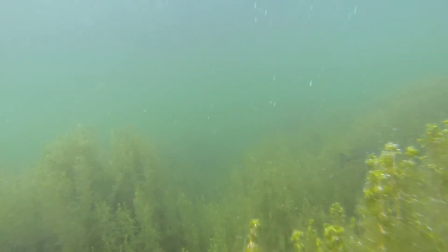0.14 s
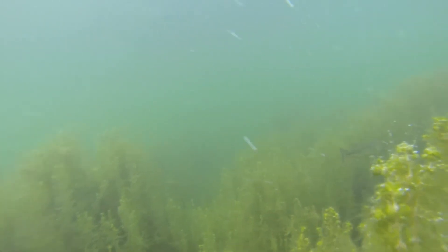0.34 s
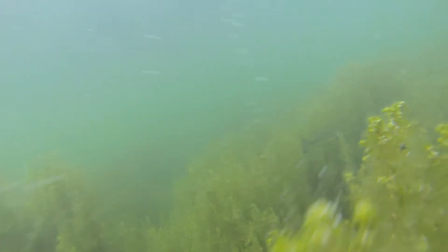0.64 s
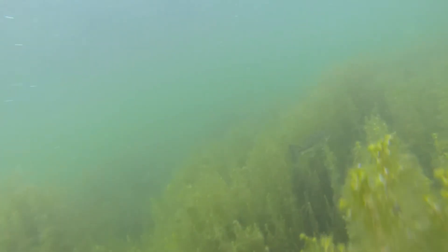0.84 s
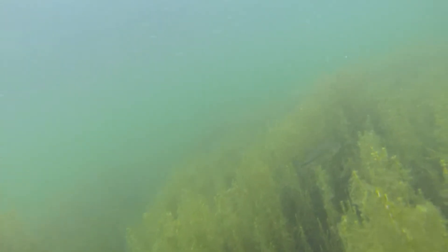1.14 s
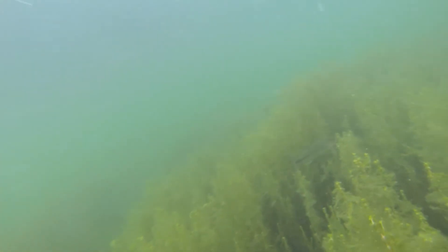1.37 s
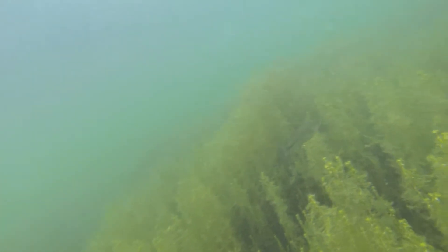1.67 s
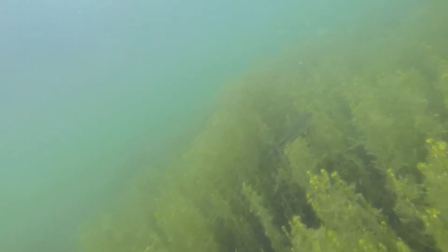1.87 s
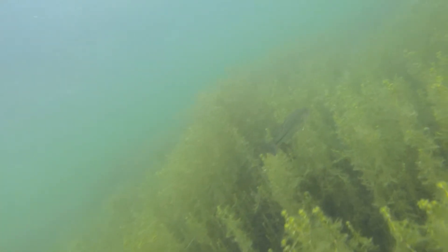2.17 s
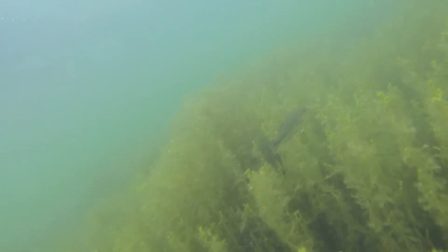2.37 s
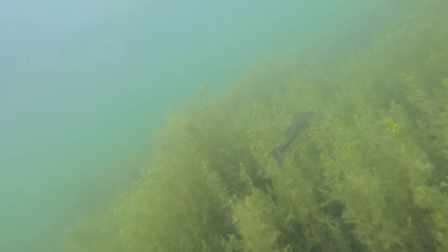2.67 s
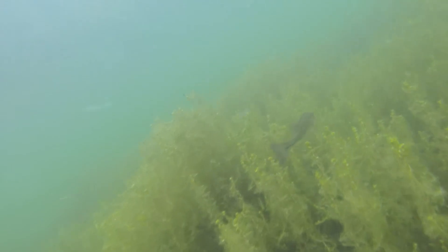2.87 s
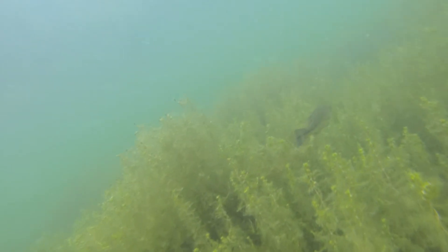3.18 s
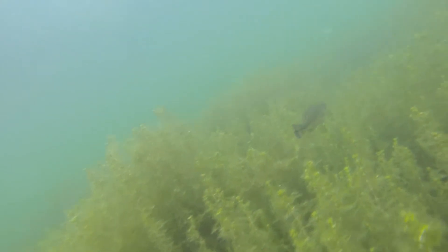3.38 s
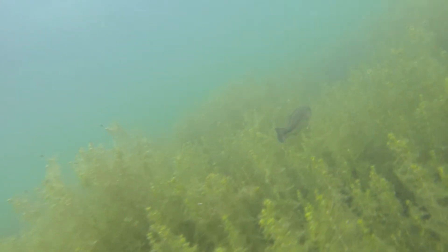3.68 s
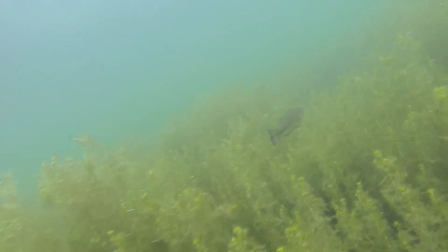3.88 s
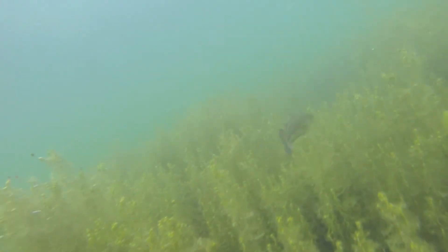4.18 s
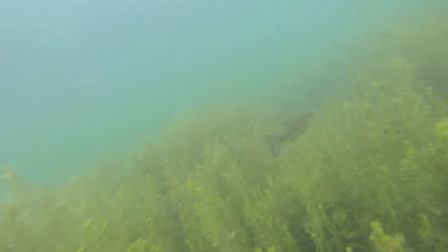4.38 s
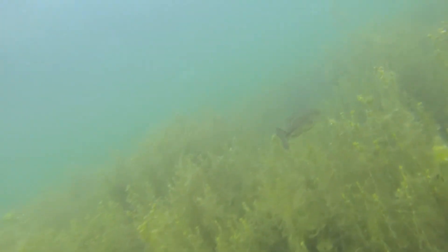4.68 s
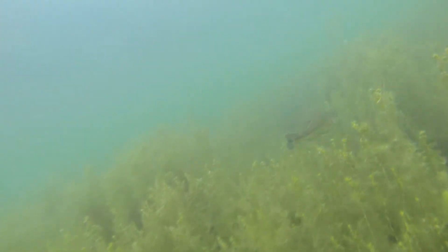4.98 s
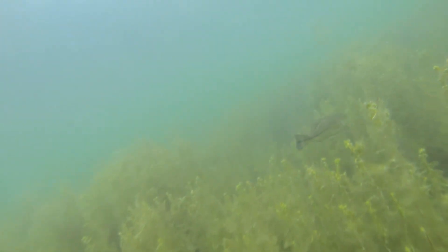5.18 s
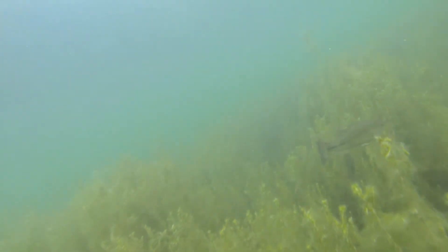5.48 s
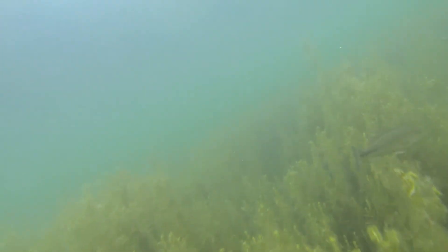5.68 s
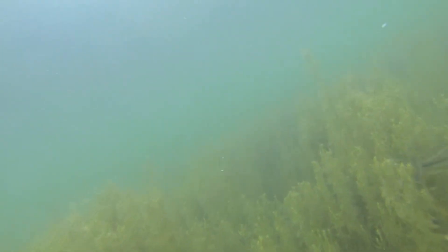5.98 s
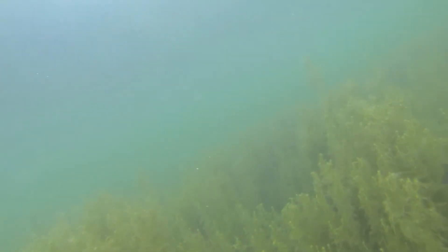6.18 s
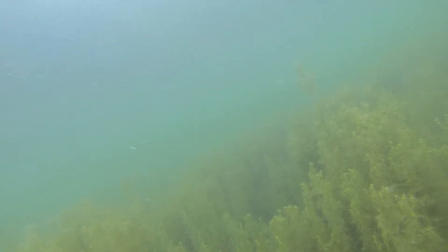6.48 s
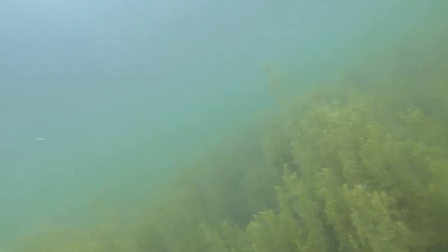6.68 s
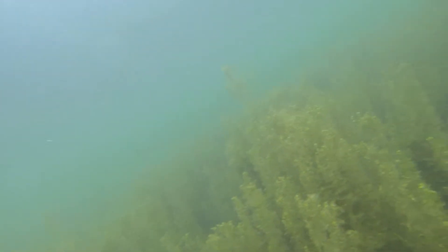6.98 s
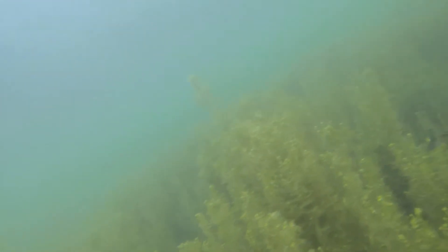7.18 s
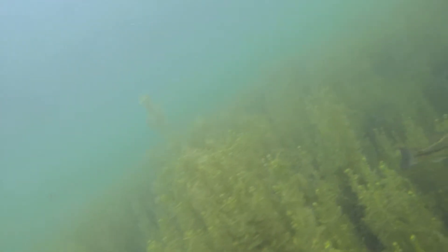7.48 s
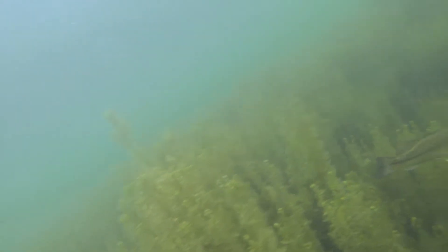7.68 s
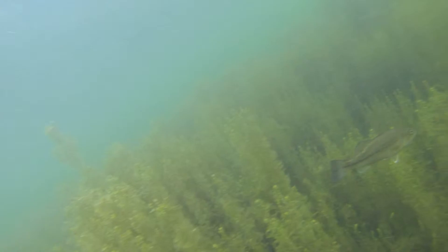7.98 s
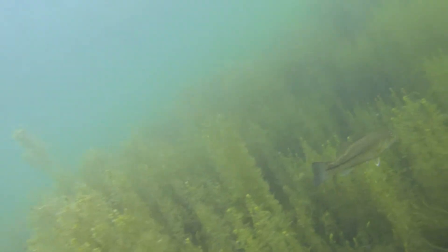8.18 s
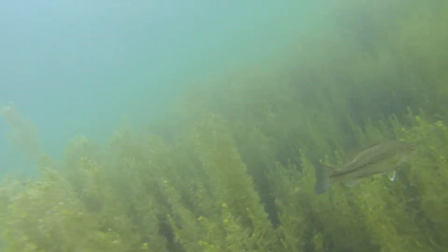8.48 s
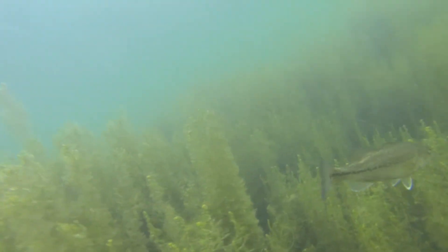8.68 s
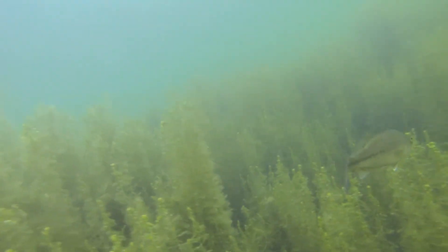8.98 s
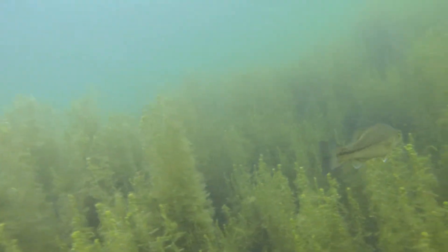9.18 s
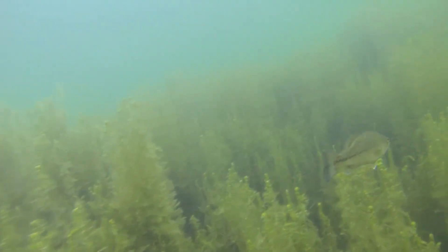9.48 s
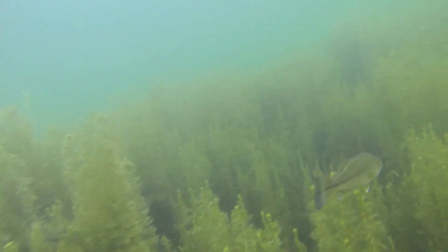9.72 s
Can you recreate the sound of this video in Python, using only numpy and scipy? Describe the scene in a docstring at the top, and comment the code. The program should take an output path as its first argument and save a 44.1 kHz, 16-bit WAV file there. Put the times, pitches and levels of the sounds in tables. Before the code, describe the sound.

Muffled deep underwater rumble with small bubble pings and dull housing knocks, then a drive motor jolts in, droning, hissing and rattling to the end.

```python
"""First comes a deep, uneven underwater rumble, with small bubble pings and knocks on a sealed housing.
A camera glides through a weedy lake: filtered noise makes the rumble, dying sines the pings and knocks.
After six seconds a drive motor jolts in, with a drone, faint whines, a pulsing hiss and rattling parts;
near 7 s there is a quick run of gurgling bumps. Hiss, ticks and rattle cracks are noise or clicks sent
through a set of wall resonances. Faint self-noise and thin wavering tones of the electronics lie underneath."""
import sys
import numpy as np
from scipy import signal
from scipy.fft import rfft, irfft, next_fast_len
from scipy.io import wavfile
from scipy.ndimage import uniform_filter1d

SR = 44100
rng = np.random.default_rng(int(sys.argv[2]) if len(sys.argv) > 2 else 0)


def generate_wav(sig):
    """Save sig (samples, or channels by samples) to the path in sys.argv[1] as 16-bit PCM at SR."""
    pcm = np.round(np.clip(np.atleast_2d(sig).T, -1, 1) * 32767).astype(np.int16)
    wavfile.write(sys.argv[1], SR, pcm)


N = 434385   # length in samples
MOTOR_ON_S = 6.155


def amp(db):
    """Turns decibels into a plain factor."""
    return 10 ** (np.asarray(db) / 20)


def rms_one(x):
    """Scales a signal to an average strength (rms) of 1."""
    return x / np.sqrt(np.mean(x ** 2) + 1e-20)


def in_time(rows):
    """Draws straight lines between table rows: each column as a curve with a value at every sample."""
    s, *columns = np.transpose(rows)
    return [np.interp(np.arange(N) / SR, s, c) for c in columns]


def drift(rate_hz):
    """Slow random wandering with a spread of 1, from smoothed noise made at every 40th sample."""
    r = np.exp(-80 * np.pi * rate_hz / SR)
    noise = rng.standard_normal(N // 40 + 2002)
    slow = signal.lfilter([1], [1, -2 * r, r * r], noise)[2000:]   # drop the filter's start-up
    return np.interp(np.arange(N) / 40, np.arange(len(slow)), rms_one(slow))


def coloured(spectrum):
    """Noise shaped to the given spectrum, rms 1."""
    size = next_fast_len(N)
    hz, db = np.transpose(spectrum)
    grid = np.log(np.maximum(np.arange(size // 2 + 1) * SR / size, 1))
    gain = amp(np.interp(grid, np.log(hz), db, left=-200, right=-200))
    return rms_one(irfft(rfft(rng.standard_normal(size)) * gain, size)[:N])


def resonance(x, hz, width_hz):
    """Two-pole resonance: favours one pitch and rings on; gain about 1 at its peak."""
    r = np.exp(-np.pi * width_hz / SR)
    top = np.array([1, 0, -1]) * (1 - r * r) / 2
    return signal.lfilter(top, [1, -2 * r * np.cos(2 * np.pi * hz / SR), r * r], x + 1e-18)


def add(out, s, hz, db, t60, rise_s):
    """Adds a sine at time s that rises softly and falls by 60 dB in t60 seconds."""
    t, at = np.arange(int(t60 * SR)) / SR, int(s * SR)
    envelope = amp(db - 60 * t / t60) * (1 - np.exp(-t / rise_s)) ** 2
    ring = envelope * np.sin(2 * np.pi * hz * t)
    out[at:at + len(t)] += ring[:N - at]


def grains(per_s, spread_db):
    """Random clicks of uneven size and either sign, rms 1."""
    sizes = amp(spread_db * np.minimum(rng.exponential(1, N), 5)) * rng.choice([-1, 1], N)
    return rms_one(sizes * (rng.random(N) < per_s / SR))


def scattered(count, from_s, to_s, db, spread_db, low_hz, high_hz):
    """Random columns of time, level and pitch: uneven strength, low pitches more common."""
    when, size, pitch = rng.random((int(count), 3)).T
    times = from_s + (to_s - from_s) * when
    levels = db + spread_db * (2 * size - 1)
    return times, levels, low_hz * (high_hz / low_hz) ** (pitch ** 2)


def wall_gain(hz, db, tilt_db):
    """Strength of one wall resonance, tilted by tilt_db per octave above 2 kHz."""
    return amp(db + tilt_db * max(np.log2(hz / 2000), 0))


# Wall resonances of the housing, before any tilt: [f/Hz, width/Hz, level/dB]
WALLS = [(1145, 40, -9.5), (1295, 91, -3.5), (1460, 58, 3), (1700, 140, 0), (1790, 36, -1), (1880, 72, 5.5),
         (1891.5, 143.6, 5.5), (2520, 230, -5.5), (2720, 180, -5), (3050, 202, -6), (3520, 160, -8.5),
         (3976, 204, -12.5), (4990, 580, -20.5), (5100, 69, -35.5), (5330, 420, -44), (6320, 240, -26),
         (6840, 680, -33.5), (8130, 440, -32), (9400, 900, -47), (13100, 900, -67)]


def walls(force, tilt_db=0, span=slice(None)):
    """The housing walls ring at their own pitches when shaken; silent outside span."""
    out = np.zeros(N)
    # neighbouring resonances take turns in sign
    out[span] = sum((-1) ** k * wall_gain(hz, db, tilt_db) * resonance(force[span], hz, width)
                    for k, (hz, width, db) in enumerate(WALLS))
    return out


def resonant_grains(per_s, spread_db, tilt_db, soft_s):
    """Each grain is a short puff that sets only one wall resonance ringing; rms 1."""
    clicks, dealt = grains(per_s, spread_db), rng.integers(0, len(WALLS), N)
    white, r = rng.standard_normal(N), np.exp(-1 / (soft_s * SR))
    total = np.zeros(N)
    for k, (hz, width, db) in enumerate(WALLS):
        puffs = white * signal.lfilter([1], [1, -2 * r, r * r], clicks * (dealt == k) + 1e-18)
        ring = resonance(resonance(puffs, hz, width), hz, 6.6 * width)
        total += wall_gain(hz, db, tilt_db) * ring
    return rms_one(total)


# Colour of the broad self-noise: [f/Hz, relative level/dB per Hz]
SELF_NOISE = [(530, -40), (900, -7.5), (1800, -9.5), (2230, -18.5), (5190, -10), (5850, -15),
              (10100, -18.5), (13600, -25.5), (14800, -33.5), (15200, -53.5)]
# Thin tones of the electronics, average levels before wavering: [f/Hz, width/Hz, level/dB]
ELECTRONICS = [(3960, 230, -81.5), (5100, 250, -80), (6630, 93, -90.5), (7800, 120, -87.5),
               (9830, 200, -87), (10430, 22, -91), (11600, 250, -90), (15561, 11, -100), (15639, 14, -96)]
SELF_NOISE_DB = -72


def electronics():
    """Broad self-noise, and thin wavering tones made by passing noise through narrow resonances."""
    white = rng.standard_normal(N)
    tones = np.zeros(N)
    for hz, width, db in ELECTRONICS:
        tone = rms_one(resonance(resonance(white, hz, width), hz, width))
        tones += amp(db + 1.3 * drift(14)) * tone
    return amp(SELF_NOISE_DB) * coloured(SELF_NOISE) + tones


# Water along the walls, before random wavering; the fizz column also sets the hiss:
# [t/s, wash level/dB, gurgle level/dB, fizz level/dB]
STREAM = [(0, -34, -56, -59), (0.3, -38, -56.5, -60), (0.6, -29.5, -54, -60.5), (1.0, -34, -55, -60.5),
          (1.9, -35, -54.5, -63.5), (2.4, -35.5, -55, -62), (3.0, -39.5, -55, -64), (3.6, -36.5, -57, -63),
          (3.9, -34, -57.5, -65), (4.2, -39, -54.5, -64), (4.55, -36.5, -56, -65), (4.9, -33, -52, -63),
          (5.2, -38.5, -56.5, -61), (5.65, -37.5, -56.5, -61.5), (6.1, -39, -57.5, -60.5),
          (6.85, -33.5, -51.5, -73), (6.99, -36, -45, -62), (7.12, -36.5, -54, -51), (7.5, -35, -55.5, -50),
          (8.0, -41, -46, -49), (8.5, -42, -53, -51.5), (9.1, -46.5, -50.5, -52.5),
          (9.85, -41.5, -50, -47.5)]
FIZZ_PER_S, FIZZ_SPREAD_DB, FIZZ_DB = 500, 3.0, -4   # FIZZ_DB: fizz grains against the hiss


def water():
    """Faint hiss and fizz of the lake: steady noise and tiny grains, heard through the walls."""
    hiss = rms_one(walls(rng.standard_normal(N), tilt_db=-8.5))
    fizz = resonant_grains(FIZZ_PER_S, FIZZ_SPREAD_DB, tilt_db=5.5, soft_s=0.001)
    _, _, level_db = in_time(STREAM)
    return amp(level_db) * (amp(1.2 * drift(11.0)) * hiss + amp(FIZZ_DB) * fizz)


# Level of the deep rumble before the low-pass; its short dips are chance beating: [t/s, level/dB]
RUMBLE = [(0.0, -36.5), (0.22, -28.5), (0.27, -37), (0.41, -15), (0.44, -29), (0.52, -11.5), (0.55, -20.5),
          (0.69, -18.5), (0.71, -28), (0.79, -17), (1.15, -17), (1.23, -13), (1.29, -38), (1.34, -17),
          (1.81, -19), (1.86, -20), (2.06, -16.5), (2.47, -19), (2.55, -14.5), (2.71, -22), (2.8, -9.5),
          (2.94, -23.5), (3.07, -15), (3.1, -27.5), (3.35, -13.5), (3.4, -27.5), (3.46, -12.5),
          (3.79, -23.5), (3.98, -18), (4.06, -24), (4.2, -12), (4.31, -19.5), (4.39, -12), (4.5, -21.5),
          (4.72, -12), (4.77, -18), (5.1, -14), (5.27, -17), (5.57, -13.5), (5.62, -27), (5.79, -16),
          (5.9, -26), (5.93, -20.5), (6.17, -19.5), (6.36, -28), (6.5, -17.5), (7.1, -16.5), (7.13, -27),
          (7.3, -16), (7.52, -21.5), (7.87, -14), (7.95, -18.5), (8.15, -12.5), (8.26, -19), (8.45, -14.5),
          (9.16, -24), (9.19, -19), (9.71, -30), (9.77, -23.5), (9.85, -42)]
# Colour of the low wash: [f/Hz, relative level/dB per Hz]
WASH = [(35, -39), (60, -3), (67, -27), (70, -4), (92, -16), (151, -18), (200, -36.5), (260, -61),
        (340, -72), (570, -120)]
# Colour of the gurgle: [f/Hz, relative level/dB per Hz]
GURGLE = [(120, -12.5), (200, 8.5), (220, 0), (356, -7), (426, -8), (576, -3.5), (966, -20), (1200, -14.5),
          (1560, -51), (2640, -120)]
ROCK_HZ, ROCK_WIDTH_HZ = 37.6, 10.4
ROCK_EVEN = 0.88   # how far the swing is evened out, 0-1


def flow():
    """Turbulence rocks the housing at a deep resonance, swinging more evenly than plain noise; water washes."""
    (rumble_db,), (wash_db, gurgle_db, _) = in_time(RUMBLE), in_time(STREAM)
    shaken = resonance(rng.standard_normal(N), ROCK_HZ, ROCK_WIDTH_HZ)
    swing = rms_one(resonance(shaken, ROCK_HZ, 34.0))
    size = np.sqrt(uniform_filter1d(swing ** 2, size=SR // 25) + 0.073)
    even_swing = rms_one(swing / size ** np.clip(ROCK_EVEN, 0, 1))
    surge = rms_one(resonance(rng.standard_normal(N), 10.0, 42))   # slow push of the water
    rumble = amp(rumble_db) * rms_one(even_swing + amp(-7.5) * surge)
    # the heavy housing cannot move fast
    rumble = signal.sosfiltfilt(signal.butter(4, 60, fs=SR, output="sos"), rumble)
    wash = amp(wash_db + 0.63 * drift(29)) * coloured(WASH)
    gurgle = amp(gurgle_db + 2.0 * drift(8.5)) * coloured(GURGLE)
    return rumble + wash + gurgle


# Sharp ticks on the walls, strength before filtering: [t/s, relative level/dB]
TICKS = [(0.91, -49.5), (1.03, -45.5), (1.037, -48), (1.046, -60), (1.069, -65), (1.209, -60), (1.236, -53),
         (1.626, -51), (2.531, -52.5), (2.779, -59), (2.792, -52), (2.834, -56), (2.842, -54),
         (3.464, -49.5), (4.2465, -54), (4.379, -53), (4.3995, -48.5), (4.406, -58), (4.414, -64),
         (4.6656, -55), (4.673, -60), (4.726, -49.5), (4.733, -64), (4.9905, -56), (5.065, -54.5),
         (5.4273, -55), (5.493, -58)]
TICK_DB = 18   # boost of every tick


def ticks():
    """Short contacts: a soft snap into the broad body, and a noisy puff that reaches the wall resonances."""
    force = np.zeros(N)
    force[[int(s * SR) for s, db in TICKS]] = amp(np.array(TICKS)[:, 1] + TICK_DB)
    r = np.exp(-1 / (0.0016 * SR))
    puff_shape = signal.lfilter([np.e * (1 - r)], [1, -2 * r, r * r], force + 1e-18)
    puff = puff_shape * rng.standard_normal(N)
    contact = puff + amp(14.0) * force
    body = amp(-2.0) * resonance(contact, 840, 370)
    body += amp(-13.0) * resonance(contact, 1100, 710)
    body += amp(-29.5) * resonance(contact, 2300, 1800)
    ringing = walls(puff, tilt_db=2.5, span=slice(int(MOTOR_ON_S * SR)))
    damped = signal.butter(2, 11000, fs=SR, output="sos")
    return signal.sosfilt(damped, amp(-3.5) * ringing + body)


# Small bubbles, level before the boosts below: [t/s, relative level/dB, f/Hz]
PINGS = [(0.1017, -50, 1630), (0.1176, -37, 1620), (0.1645, -35.5, 1890), (0.2214, -40, 1980),
         (0.2623, -33.5, 1680), (0.3282, -37.5, 1790), (0.376, -35, 1500), (0.4459, -37.5, 1570),
         (0.5467, -37.5, 1520), (0.5661, -40, 1480), (0.594, -45, 1730), (0.6155, -38, 1910),
         (0.7008, -46, 1420), (0.7382, -39.5, 1790), (0.8924, -48, 1480), (0.9108, -38, 1600),
         (1.0306, -47, 1470), (1.0695, -59, 1300), (1.1363, -48, 1880), (1.2451, -49, 1480),
         (1.2825, -39.5, 1580), (1.4227, -42.5, 1480), (1.495, -36, 1550), (1.5309, -45, 1530),
         (1.9106, -45.5, 1820), (2.1919, -43, 1650), (2.2443, -42, 1840), (2.3106, -42, 1800),
         (2.3346, -36, 1830), (2.4114, -40.5, 1730), (2.5311, -50, 1290), (2.7921, -51, 1290),
         (2.824, -47, 1790), (2.8724, -40, 1760), (2.9806, -47, 1790), (3.1892, -46, 1790),
         (3.2355, -31.5, 1700), (3.4017, -53, 1780), (3.4535, -51, 1310), (3.465, -42, 1570),
         (3.5518, -41.5, 1790), (3.6037, -46, 1480), (3.8287, -46, 1800), (3.9095, -41.5, 1780),
         (4.14, -40, 1780), (4.2482, -56, 1300), (4.3335, -45, 1740), (4.3999, -41, 1620),
         (4.4832, -53, 1460), (4.7262, -46, 1450), (4.7466, -46, 1890), (4.783, -45, 1590),
         (4.814, -57, 1450), (4.8823, -38, 1640), (4.9422, -50, 1480), (4.9901, -57, 1350),
         (5.0065, -45, 1460), (5.1297, -46, 1450), (5.22, -53, 1420), (5.245, -42, 1490),
         (5.2704, -40, 1520), (5.3028, -43, 1480), (5.3882, -50, 1470), (5.5712, -37.5, 1790),
         (5.6496, -48, 1880), (5.7583, -48, 1480), (5.8062, -43, 1480), (5.8267, -41, 1850),
         (5.9269, -47, 1420), (5.9783, -43, 1760), (6.0172, -46, 1770), (6.0482, -40, 1750),
         (6.0681, -36, 1740), (6.118, -38, 1850), (6.1464, -43, 1430), (0.0267, -47, 2620),
         (0.1365, -50, 2730), (0.1569, -41.5, 3390), (0.2563, -63, 2970), (0.2803, -60, 2550),
         (0.4654, -45, 2350), (0.6528, -37.5, 2880), (0.6793, -43, 2300), (0.7138, -58, 2720),
         (0.7501, -49, 3000), (0.9716, -51, 2750), (1.1188, -45, 2600), (1.233, -49, 2310),
         (1.285, -42.5, 2750), (1.3128, -51, 3520), (1.3986, -36, 2990), (1.442, -55, 2950),
         (1.5303, -46, 3020), (1.6246, -47, 2280), (1.8581, -47, 2980), (2.0157, -50, 2930),
         (2.0925, -53, 3500), (2.132, -51, 3550), (2.158, -53, 3000), (2.2777, -55, 3650),
         (2.3214, -54, 2480), (2.3521, -63, 3000), (2.392, -43, 4050), (2.4074, -59, 2350),
         (2.5496, -59, 2360), (2.605, -38, 3040), (2.6652, -44, 2540), (2.7202, -55, 2840),
         (2.7515, -45, 3160), (2.8319, -48, 2350), (2.8643, -44, 2950), (3.026, -53, 3300),
         (3.066, -50, 3180), (3.235, -58, 3030), (3.6595, -44, 3050), (3.9079, -47, 2940),
         (3.9987, -49, 2560), (4.571, -46, 2520), (4.6053, -52, 2470), (5.2479, -58, 2420),
         (5.2648, -46, 2350), (5.6435, -54, 2780), (5.7837, -49, 2700), (5.8186, -57, 2300),
         (5.8192, -44, 2620), (5.872, -49, 2570), (5.9323, -53, 3520), (5.9448, -45.5, 2660),
         (6.0316, -52, 2750)]
PING_RISE_S, PING_T60_S = 0.0013, 0.024
PING_DB, PING_SNAP_DB = 1, 18   # boosts of the ring and of the snap into the walls
# extra bubbles at random, up to the motor's start
FAINT_PINGS, FAINT_PING_DB, FAINT_PING_SPREAD_DB = 22, -58, 3
PING_LOW_HZ, PING_HIGH_HZ = 1420, 3520


def pings():
    """Each bubble rings briefly at its own pitch and its snap shakes the walls."""
    out, force = np.zeros(N), np.zeros(N)
    faint = scattered(FAINT_PINGS, 0, MOTOR_ON_S, FAINT_PING_DB, FAINT_PING_SPREAD_DB,
                      PING_LOW_HZ, PING_HIGH_HZ)
    for s, db, hz in list(PINGS) + list(zip(*faint)):
        add(out, s, hz, db + PING_DB, PING_T60_S, PING_RISE_S)
        add(force, s, hz, db + PING_SNAP_DB, t60=0.0039, rise_s=0.00043)
    return out + walls(force, tilt_db=3.0, span=slice(int((MOTOR_ON_S + .1) * SR)))


# Knocks on the housing and, near 7 s, a quick run of gurgling bumps, before boosts:
# [t/s, relative level/dB, thump over it/dB, f/Hz]
KNOCKS = [(0.439, -26.5, 6.5, 465), (0.444, -33.5, -3, 835), (0.449, -30.5, -11, 650),
          (0.52, -33.5, 8.5, 610), (0.563, -46, 25, 500), (0.909, -24, 8, 610), (0.931, -39, 3, 770),
          (0.944, -51, 25, 603), (0.97, -47, -1, 700), (0.993, -45, 10, 600), (1.031, -22.5, 12, 618),
          (1.211, -47, 5, 560), (1.234, -42.5, 12, 422), (1.492, -23.5, 6, 678), (1.497, -21, 7.5, 467),
          (1.614, -37, 3, 637), (1.624, -42.5, 0, 700), (1.654, -41.5, -2, 700), (2.532, -44, -13.5, 670),
          (2.779, -39.5, -14, 593), (2.792, -45, -9, 684), (2.842, -51, -6, 810), (3.452, -45.5, 17.5, 407),
          (4.245, -47, 16, 407), (4.379, -44, 16, 400), (4.689, -39.5, 6, 480), (4.718, -42.5, 11.5, 436),
          (5.43, -43, 2, 580), (5.494, -46, -1, 593), (6.859, -43, 25.5, 403), (6.95, -30, 0, 534),
          (6.965, -33.5, 6, 423), (6.975, -39.5, 16, 433), (6.994, -47, -4, 410), (7.01, -35, -10, 453),
          (8.4222, -26, 7.5, 673), (8.4241, -24, -5, 470), (8.4285, -32, 15, 780), (8.516, -41, -2, 600)]
# Deep thump, before a boost: [f/Hz, relative level/dB, t60/s]
THUMP = [(111.5, -2, 0.051), (136.9, -1.5, 0.055), (215, -31, 0.032)]
# Weaker ringing of the body, varied by chance at each knock: [f/Hz, relative level/dB, t60/s]
KNOCK_RING = [(316.7, -15, 0.14), (409, -14.5, 0.078), (500, -15.5, 0.055), (720, -11.5, 0.11),
              (880, -18, 0.067), (1030, -24.5, 0.035), (1630, -29, 0.045), (2030, -22.5, 0.024)]
KNOCK_TONE_DB = 3   # boost of the short ring
THUMP_DELAY_S, THUMP_RISE_S = 0.0034, 0.0096
# fade time of the scrape; dB of that length lost per dB of thump
SCRAPE_S, SCRAPE_LOSS = 0.022, 0.36


def knocks():
    """Each knock or bump: a short ring and a scrape, weaker body modes, and a thump that swells a little later."""
    out, scrape = np.zeros(N), np.zeros(N)
    chance = rng.normal(0, 2.5, (len(KNOCKS), len(KNOCK_RING)))
    t = np.arange(SR // 5) / SR
    for (s, db, thump_db, hz), own_db in zip(KNOCKS, chance):
        add(out, s, hz, db + KNOCK_TONE_DB, t60=0.035, rise_s=0.0007)
        at = int(s * SR)
        fade_s = SCRAPE_S * amp(-SCRAPE_LOSS * max(thump_db, 0))
        scrape[at:at + SR // 5] += amp(db - 5.0) * np.exp(-t / fade_s)
        for (mode_hz, mode_db, t60), extra_db in zip(KNOCK_RING, own_db):
            add(out, s, mode_hz, db + mode_db + extra_db, t60, rise_s=0.0005)
        for mode_hz, mode_db, t60 in THUMP:
            add(out, s + THUMP_DELAY_S, mode_hz, db + thump_db + mode_db + 17.5, t60, THUMP_RISE_S)
    dull = signal.butter(4, [420, 950], "band", fs=SR, output="sos")
    return out + signal.sosfilt(dull, scrape * rng.standard_normal(N))


# Level of the drone, before wavering: [t/s, level/dB]
LOAD = [(6.2, -31.5), (6.22, -44), (6.25, -37), (6.28, -43), (6.32, -41), (6.47, -36), (6.83, -36.5),
        (6.86, -42), (6.89, -39), (7.24, -33.5), (7.32, -32), (7.37, -40), (7.4, -33), (7.59, -35),
        (7.94, -34), (8.06, -40), (8.21, -32.5), (8.38, -38.5), (8.44, -30.5), (8.47, -32), (8.72, -39.5),
        (8.75, -28.5), (8.79, -37), (8.89, -35), (9.11, -35.5), (9.16, -29.5), (9.23, -39), (9.24, -33),
        (9.72, -36), (9.85, -39)]
# Colour of the drone: [f/Hz, relative level/dB per Hz]
DRONE = [(47, -41), (80, -7.5), (161, 6), (250, -4), (359, -19.5), (401, -26), (570, -18.5), (643, -33),
         (725, -33), (800, -64), (874, -22.5), (954, -111), (1100, -19.5), (1430, -44), (2420, -120)]


def drone():
    """The motor's low drone: coloured noise with a wavering level."""
    (level_db,) = in_time(LOAD)
    return amp(level_db + 0.57 * drift(48.0)) * coloured(DRONE)


# Faint whines, before flicker: [f/Hz, width/Hz, level over the shared whine level/dB]
WHINE = [(419, 8.8, 6.5), (863, 12, -7)]
# The whine swells now and then, on top of its base level: [t/s, peak of the added swell/dB]
SWELLS = [(6.35, -70), (6.93, -76), (7.28, -66), (7.44, -64), (8.1, -81), (8.435, -67), (8.69, -55),
          (8.93, -64), (9.45, -58.5)]
WHINE_DB, SWELL_S, WHINE_FLICKER_DB = -66.5, 0.027, 4   # base level, width of a swell, spread


def whine(t):
    """Narrow bands of noise that flicker and sometimes swell."""
    level = amp(WHINE_DB) + sum(amp(db) / (1 + ((t - s) / SWELL_S) ** 2) ** 2 for s, db in SWELLS)
    tones = np.zeros(N)
    for hz, width, db in WHINE:
        flicker = amp(db + WHINE_FLICKER_DB * drift(6.0))
        tones += flicker * rms_one(resonance(rng.standard_normal(N), hz, width))
    return level * tones


TURNS_PER_S, FIRST_TURN_S = 17.02, 6.7
CHATTER_PER_S, CHATTER_SPREAD_DB = 1200, 3.8   # rate before it varies with the turn and by chance
TURN_SWELL_DB, RUB_FLICKER_DB, STEADY_RUB_DB = 1.5, 2.3, -5


def wall_hiss(t):
    """Rubbing and clumped contacts shake the walls, swelling once per turn of the motor."""
    turn = np.cos(2 * np.pi * TURNS_PER_S * (t - FIRST_TURN_S))
    rub = rng.standard_normal(N) * amp(TURN_SWELL_DB * turn + RUB_FLICKER_DB * drift(35))
    chatter_rate = CHATTER_PER_S * amp(5.1 * turn + 4.0 * drift(13.0))
    chatter = resonant_grains(chatter_rate, CHATTER_SPREAD_DB, tilt_db=8.5, soft_s=0.00049)
    # broad, clumped contacts on a steady rub
    contacts = grains(400 * amp(6.5 * turn + 2.8 * drift(39)), CHATTER_SPREAD_DB)
    snaps = contacts + amp(STEADY_RUB_DB) * rub
    dull_hiss = rms_one(walls(rub, tilt_db=-44.0))
    return dull_hiss + amp(-11.0) * chatter + amp(-12.5) * rms_one(walls(snaps, tilt_db=6.5))


# Rattle hits, strong and faint, before boosts: [t/s, relative level/dB, f/Hz, crack over it/dB]
RATTLE = [(6.1806, -34, 1790, -9), (6.207, -28, 1700, -27), (6.2403, -38, 1730, -18),
          (6.2507, -28, 1740, -17), (6.322, -16.5, 1790, -16), (6.356, -27.5, 1760, -9),
          (6.4358, -26, 1790, -16), (6.489, -29, 1770, -8), (6.4972, -19.5, 1850, -9),
          (6.5026, -15, 1800, -16.5), (6.5418, -26, 1800, -20), (6.5565, -20, 1770, -9.5),
          (6.565, -18, 1790, -25), (6.6443, -32, 1900, -5), (6.6584, -27, 1870, -14),
          (6.6689, -21, 1880, -15), (6.6742, -26, 1900, -6), (6.787, -31, 1800, -3),
          (6.8493, -23.5, 1880, -7.5), (6.8613, -26, 1840, -10), (6.9116, -32, 1820, -12),
          (6.9466, -26.5, 1770, -7.5), (6.9706, -25, 1800, -4), (7.0199, -28, 1880, -5.5),
          (7.0813, -18.5, 1800, -14.5), (7.1347, -37, 1740, -15), (7.1472, -30, 1750, -2.5),
          (7.199, -25.5, 1790, -7), (7.2459, -28, 1710, -15), (7.3033, -26, 1760, -28),
          (7.3513, -23.5, 1700, -11), (7.3802, -28, 3060, -3), (7.438, -15.5, 1760, -15.5),
          (7.5482, -15.5, 1790, -16), (7.6116, -23.5, 1810, -13), (7.648, -26.5, 1700, -11.5),
          (7.7094, -25.5, 1870, -17), (7.7272, -29, 1700, -8), (7.7717, -25, 1880, -12),
          (7.7922, -24, 1780, -6), (7.8032, -20.5, 1900, -21), (7.824, -34, 1700, -1),
          (7.8494, -24, 1790, -12), (7.949, -33, 1990, -5), (7.969, -31, 1900, -1), (8.0222, -29, 3100, -7),
          (8.0691, -34, 1880, 1.5), (8.1305, -25.5, 1890, -10.5), (8.2646, -35, 1700, 1.5),
          (8.3015, -31, 1880, -6), (8.319, -23.5, 1880, -7.5), (8.3579, -30, 2440, -25),
          (8.3806, -21.5, 1930, -8), (8.4975, -30, 2460, -4.5), (8.5629, -26.5, 1940, -4.5),
          (8.6207, -39, 1890, -7), (8.6547, -30, 1660, -3), (8.6759, -27, 1920, -8),
          (8.7155, -24, 2430, -17), (8.74, -34.5, 1880, 0), (8.7963, -31.5, 2520, -1),
          (8.8308, -32.5, 3960, -5), (8.844, -33, 1920, -12), (8.8517, -35.5, 1880, 4),
          (8.9057, -35, 1750, -2.5), (8.974, -31.5, 1950, 3), (9.0839, -31, 1980, 1),
          (9.1494, -23.5, 1660, -14.5), (9.202, -21, 1920, -6.5), (9.3298, -31.5, 1630, 0.5),
          (9.4355, -29, 1980, -3.5), (9.4964, -29.5, 2550, -3), (9.6723, -27.5, 1660, -8),
          (9.709, -30, 2570, -18), (9.719, -27, 2500, -18), (9.7384, -25.5, 1720, -1),
          (6.1677, -44, 2660, -11), (6.3365, -24, 2600, -9), (6.4501, -40, 2600, 2.5),
          (6.4675, -39, 2760, -12), (6.5967, -38, 2650, -6), (6.6117, -34, 2700, 3),
          (6.7025, -36, 3000, -15), (6.7291, -50, 2740, -14), (6.7549, -37, 2530, -2),
          (6.8137, -32, 3000, -15), (6.8951, -39, 2610, -8), (7.1141, -48, 3100, -15),
          (7.1769, -36, 2380, 0), (7.3226, -48, 3020, -15), (7.4977, -47, 2410, -10),
          (7.5201, -45, 3000, -12), (7.7361, -31, 2500, -9), (7.8783, -38, 2570, -2),
          (8.0025, -42, 3080, -13), (8.1717, -42, 2700, -2), (8.237, -43, 3030, -11),
          (8.2465, -38, 3120, -3), (8.4181, -35, 3000, -4), (8.4351, -34, 3390, -4), (8.466, -34, 2460, -6),
          (8.5318, -33, 2630, -7), (8.6002, -42, 2640, -11), (8.6087, -33, 2520, 0),
          (8.7768, -43, 2540, -14), (8.955, -39, 3600, -14), (9.0731, -30, 3520, -10),
          (9.0944, -30, 3060, -1), (9.1245, -36, 2460, -3), (9.1883, -42, 2500, -6),
          (9.2114, -34, 2600, -6), (9.2637, -35.5, 3550, -10), (9.2976, -35, 2480, -6),
          (9.362, -44, 3410, -15), (9.3771, -33, 3240, -8), (9.4757, -35.5, 2530, 0),
          (9.5276, -40, 4040, 2), (9.5635, -35.5, 2490, 0), (9.625, -35, 2500, -1), (9.6443, -42, 2530, -6),
          (9.7815, -34, 2680, -3)]
RATTLE_RING_DB, RATTLE_T60_S, RATTLE_RISE_S = 3.5, .017, .0008   # boost, length, rise of the ring
CRACK_LEAD_S = .002   # the crack starts this long before the hit
# extra faint hits at random
EXTRA_HITS, EXTRA_DB, EXTRA_SPREAD_DB, EXTRA_CRACK_DB = 31, -45, 1.5, 1
EXTRA_LOW_HZ, EXTRA_HIGH_HZ = 1480, 1980
EXTRA_PULL = 0.34   # how far they bunch towards the same point of each turn, 0-1


def rattle(lift_db):
    """Loose parts hit: each gives a short ring, and a noisy crack that shakes the walls."""
    out, force = np.zeros(N), np.zeros(N)
    when, size_db, pitch = scattered(EXTRA_HITS, MOTOR_ON_S, N / SR - .05, EXTRA_DB, EXTRA_SPREAD_DB,
                                     EXTRA_LOW_HZ, EXTRA_HIGH_HZ)
    turns = (when - FIRST_TURN_S) * TURNS_PER_S
    when = when - EXTRA_PULL * (turns - np.round(turns)) / TURNS_PER_S
    extra = [(*row, EXTRA_CRACK_DB) for row in zip(when, size_db, pitch)]
    for s, db, hz, crack_db in list(RATTLE) + extra:
        add(out, s, hz, db + RATTLE_RING_DB, RATTLE_T60_S, RATTLE_RISE_S)
        force[int((s - CRACK_LEAD_S) * SR)] = amp(db + crack_db + 25.0)
    # each crack builds up to the hit, then fades
    fade, rise = np.exp(-1 / (np.array([0.0016, 0.0015]) * SR))
    shape = signal.lfilter([1 - rise], np.convolve([1, -fade], [1, -rise]), force + 1e-18)
    contact = shape * rng.standard_normal(N)
    # a weaker buzz grows before it and dies after it
    tail = np.exp(-1 / (0.0046 * SR))
    buzz = signal.filtfilt([1 - tail], [1, -tail], np.abs(contact)) * rng.standard_normal(N)
    contact = contact + amp(5.0) * buzz
    crack = signal.sosfilt(signal.butter(4, 2200, "high", fs=SR, output="sos"), contact)
    crack = walls(crack, tilt_db=-1.5, span=slice(int(MOTOR_ON_S * SR), None))
    return out + crack + (amp(lift_db) - 1) * resonance(crack, 5570, 1200)


# Tone of the drive motor; the lift also colours the cracks:
# [t/s, base level of wall hiss/dB, lift near 5 kHz/dB, treble lift/dB]
MOTOR = [(6.1, -44, 7, 7), (6.25, -42, 8, 4), (6.5, -42, 2.5, 0.5), (7.0, -41, 5.5, -1),
         (7.35, -45.5, 8.5, 5), (7.65, -42.5, 9, 4), (8.16, -44.5, 4, 4.5), (8.46, -43.5, 7.5, 10.5),
         (8.7, -44.5, 3.5, 12), (9.0, -46.5, -3, 10.5), (9.39, -47, 4, 10.5), (9.85, -45.5, 1, 9.5)]
SPIN_UP_S = .04


def motor():
    """The drive jolts in and fades up its drone, whines and wall hiss, with loose parts rattling."""
    hiss_db, lift_db, bright_db = in_time(MOTOR)
    t = np.arange(N) / SR
    running = np.clip((t - MOTOR_ON_S) / SPIN_UP_S, 0, 1) ** 2
    hiss = wall_hiss(t)
    treble = signal.sosfilt(signal.butter(2, 5500, "high", fs=SR, output="sos"), hiss)
    lifted = (amp(lift_db) - 1) * resonance(hiss, 4500, 1000)
    bright_hiss = hiss + (amp(bright_db) - 1) * treble + lifted
    out = running * (drone() + whine(t) + amp(hiss_db) * bright_hiss)
    add(out, MOTOR_ON_S + 0.0262, 192.0, -27.0, t60=0.15, rise_s=0.0015)   # jolt as the drive engages
    return out + rattle(lift_db)


def scene():
    """All layers together, from the background to the motor, as one channel."""
    return (electronics() + water() + flow() + ticks() + pings() + knocks() + motor())[None]


CUTOFF_HZ = 15700


def record(dry):
    """A steep low-pass filter cuts the top."""
    return signal.sosfilt(signal.ellip(12, .5, 70, CUTOFF_HZ, fs=SR, output="sos"), dry)


dry = scene()
out = record(dry)
generate_wav(out)
```